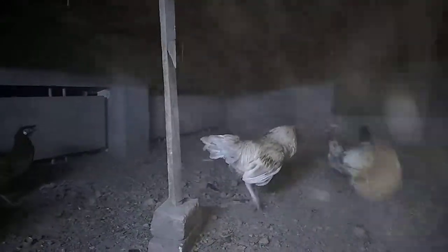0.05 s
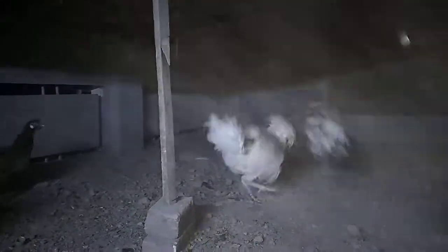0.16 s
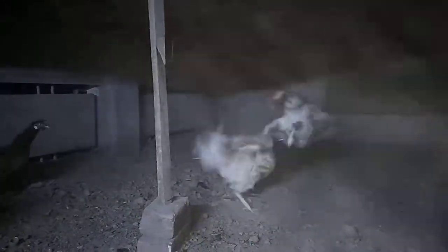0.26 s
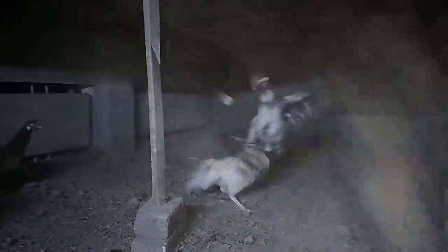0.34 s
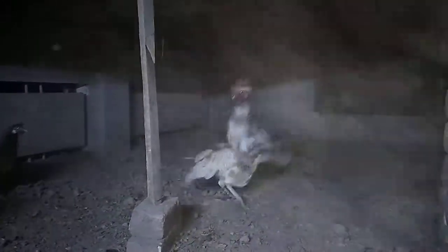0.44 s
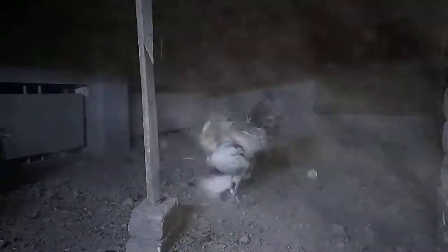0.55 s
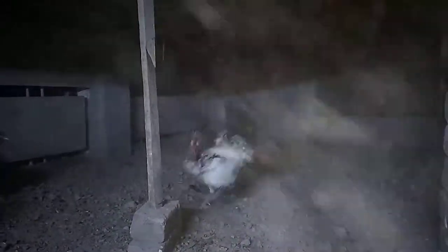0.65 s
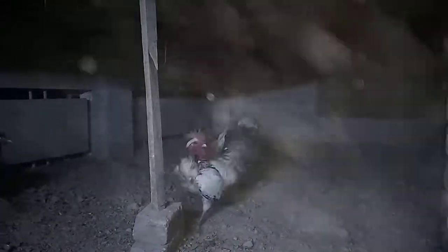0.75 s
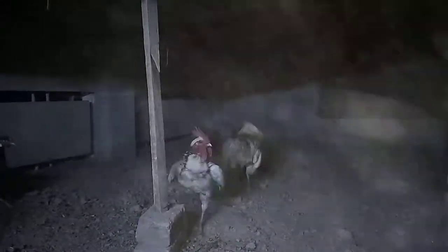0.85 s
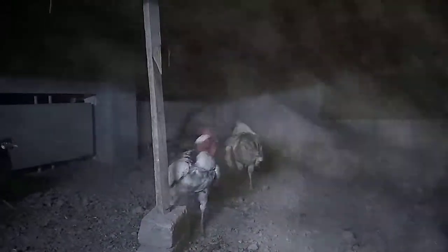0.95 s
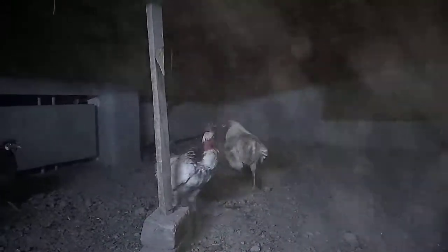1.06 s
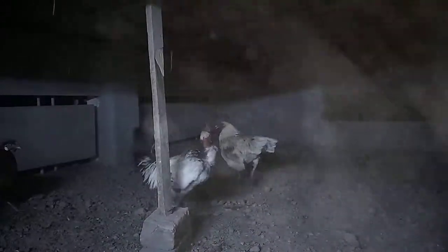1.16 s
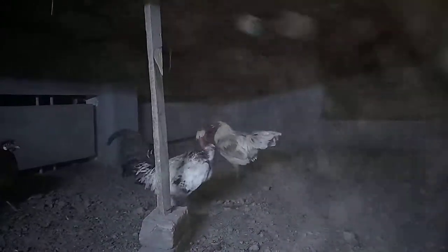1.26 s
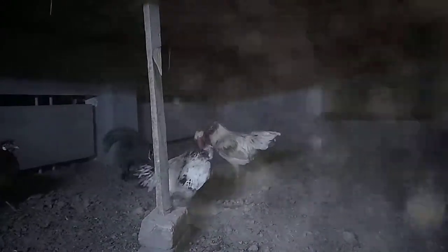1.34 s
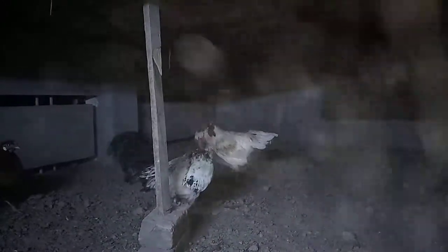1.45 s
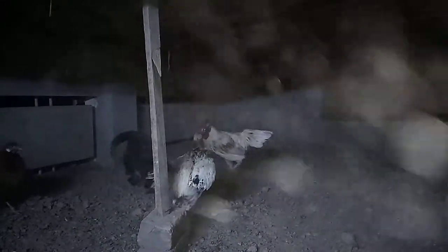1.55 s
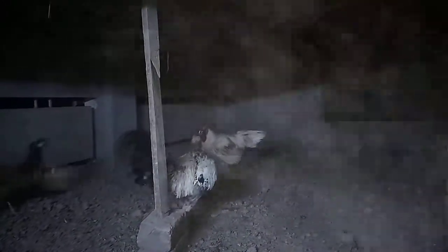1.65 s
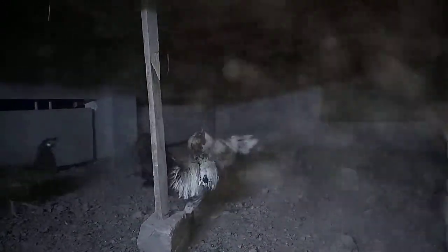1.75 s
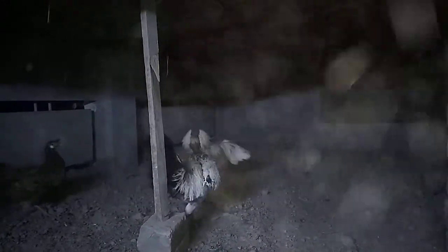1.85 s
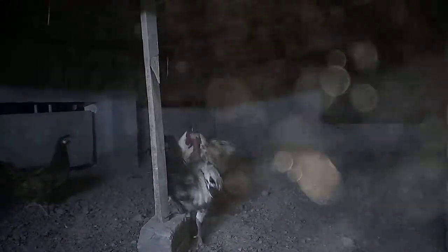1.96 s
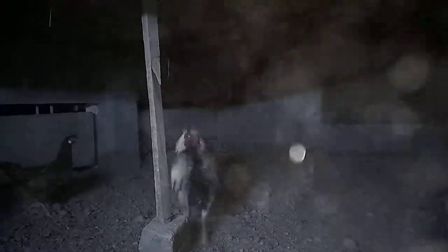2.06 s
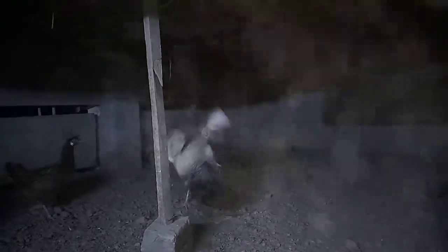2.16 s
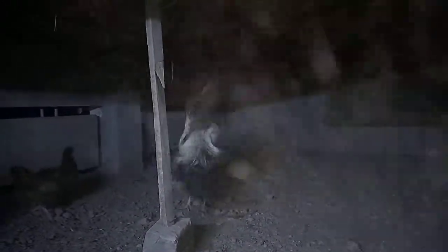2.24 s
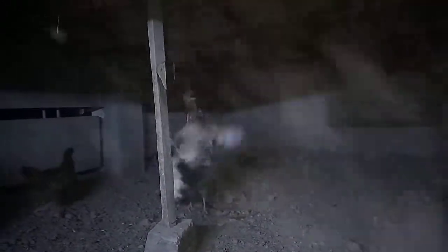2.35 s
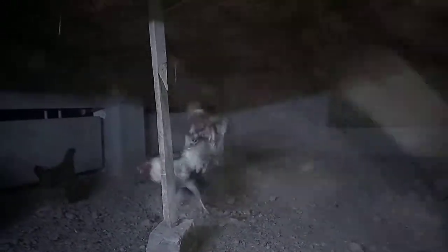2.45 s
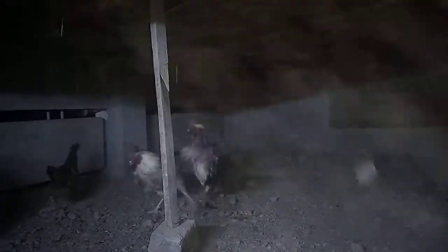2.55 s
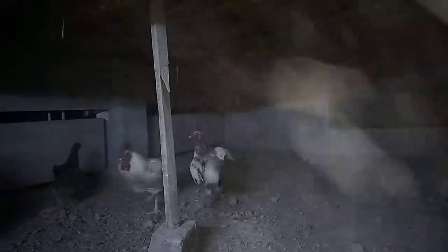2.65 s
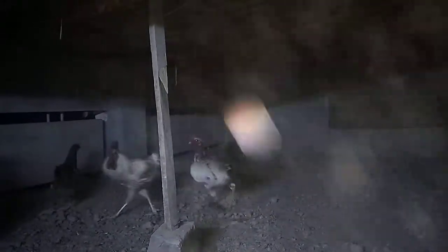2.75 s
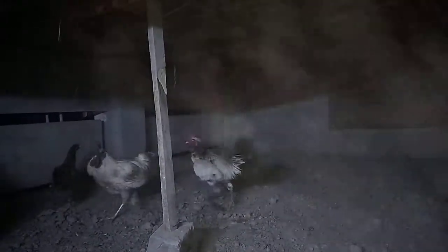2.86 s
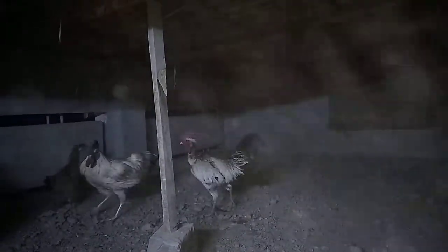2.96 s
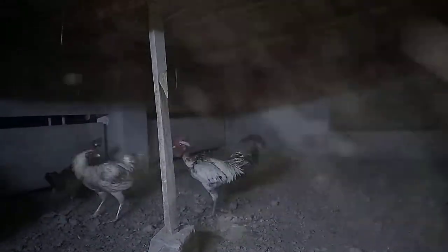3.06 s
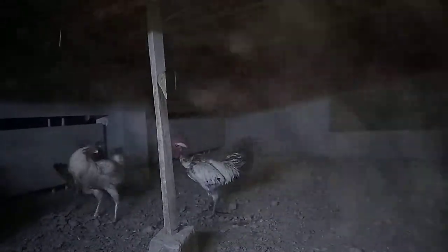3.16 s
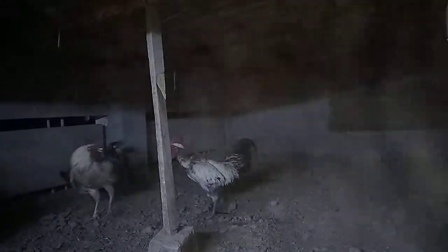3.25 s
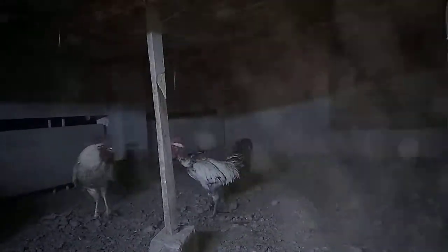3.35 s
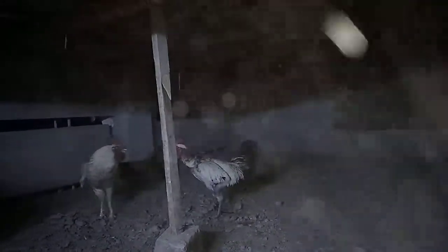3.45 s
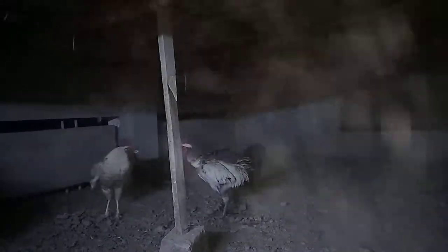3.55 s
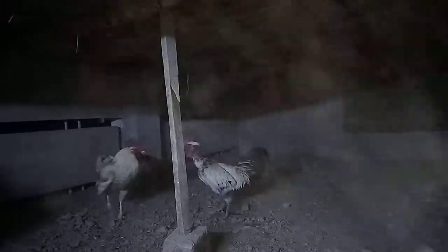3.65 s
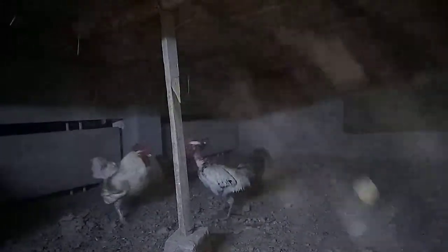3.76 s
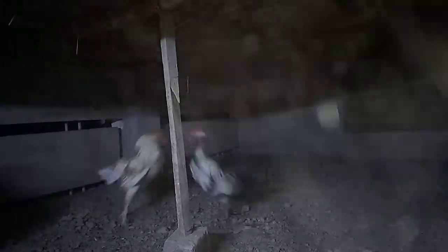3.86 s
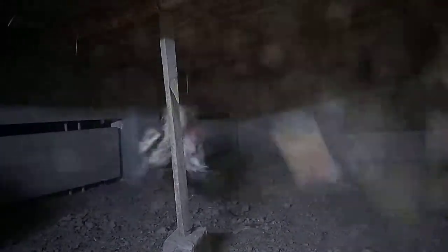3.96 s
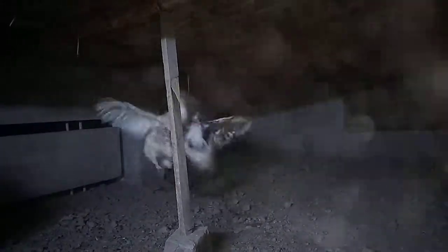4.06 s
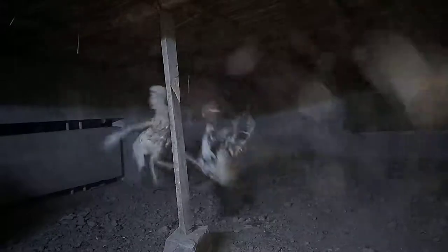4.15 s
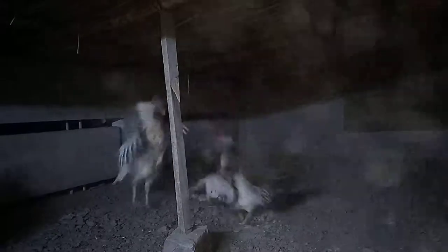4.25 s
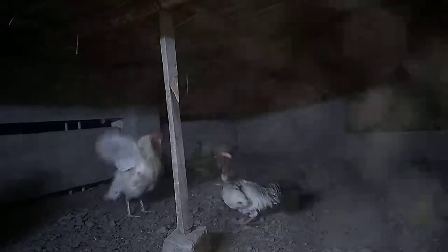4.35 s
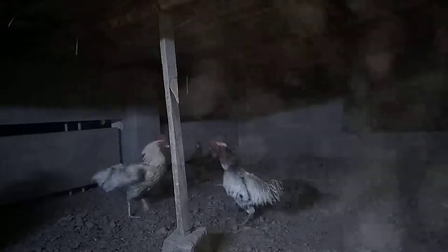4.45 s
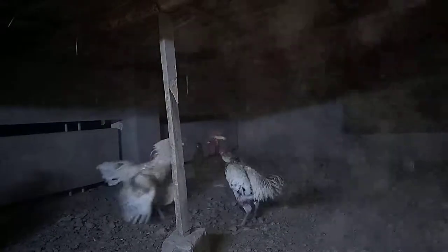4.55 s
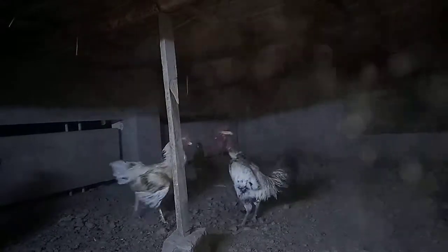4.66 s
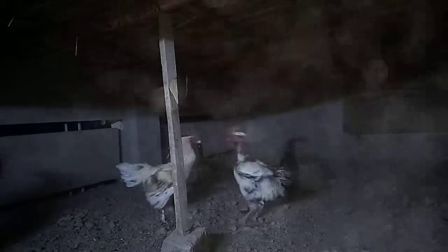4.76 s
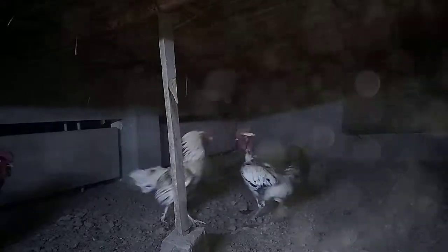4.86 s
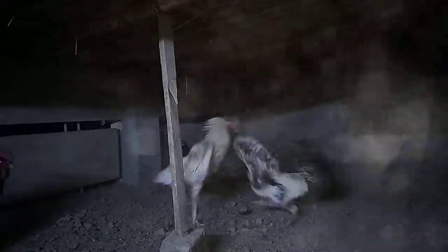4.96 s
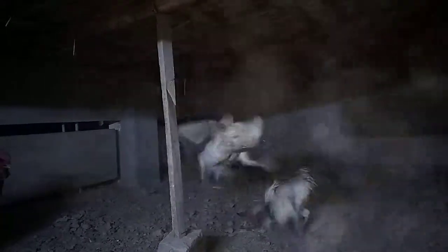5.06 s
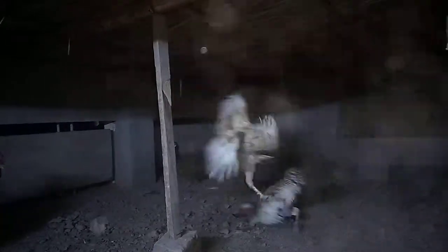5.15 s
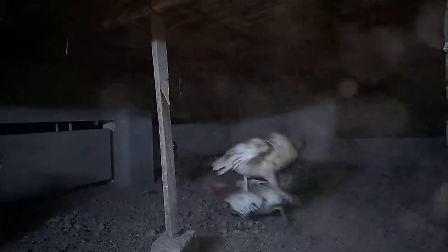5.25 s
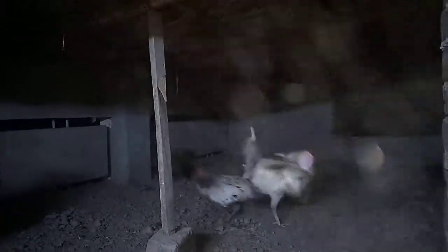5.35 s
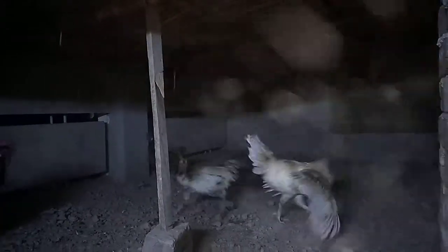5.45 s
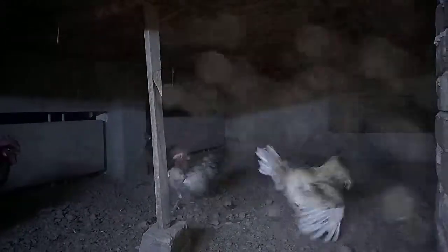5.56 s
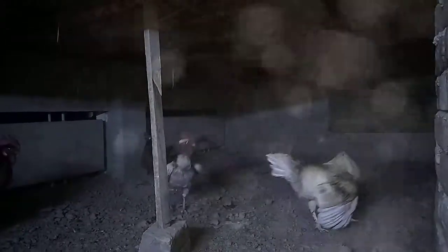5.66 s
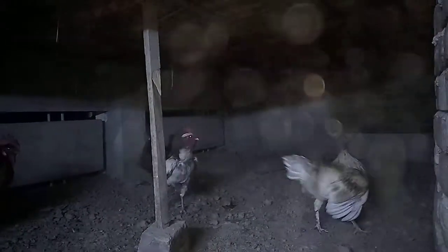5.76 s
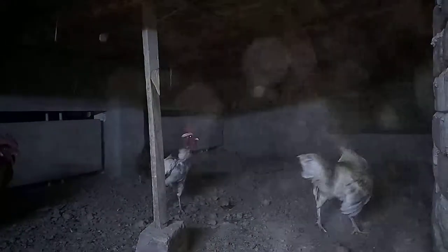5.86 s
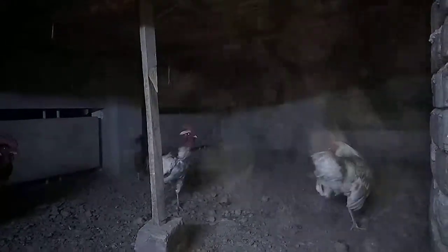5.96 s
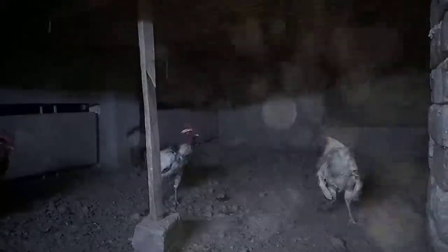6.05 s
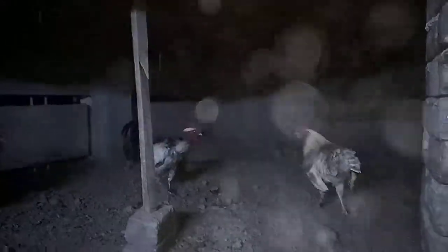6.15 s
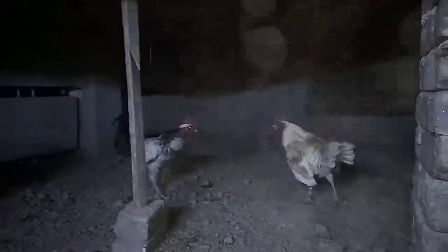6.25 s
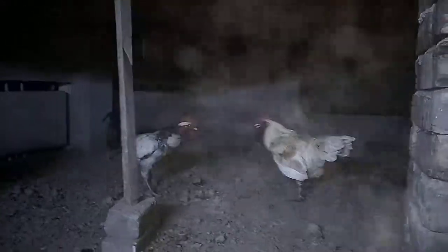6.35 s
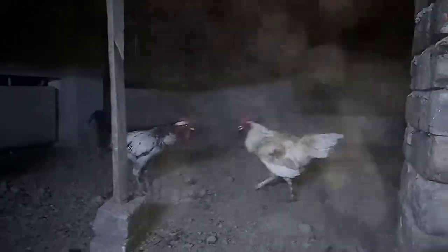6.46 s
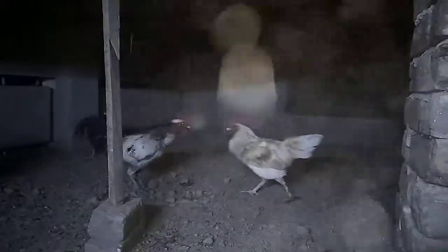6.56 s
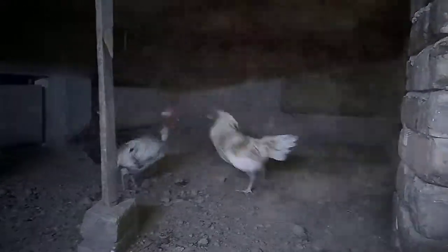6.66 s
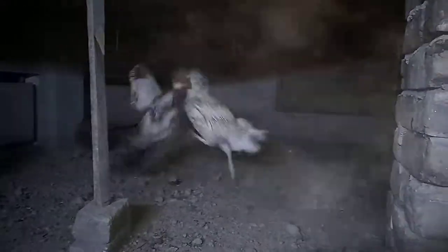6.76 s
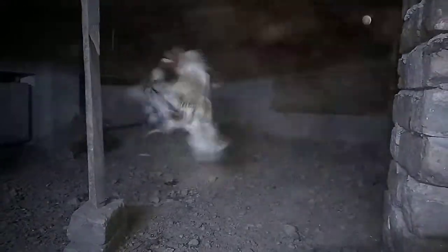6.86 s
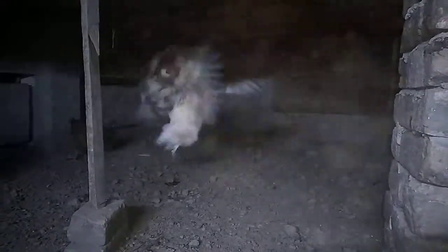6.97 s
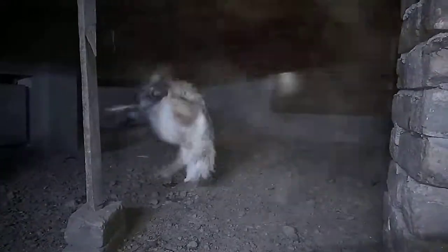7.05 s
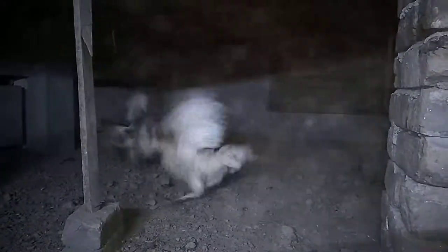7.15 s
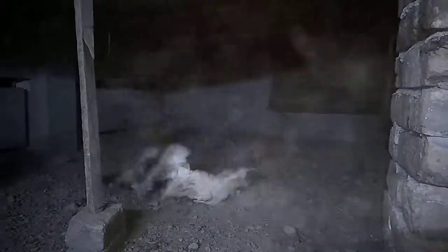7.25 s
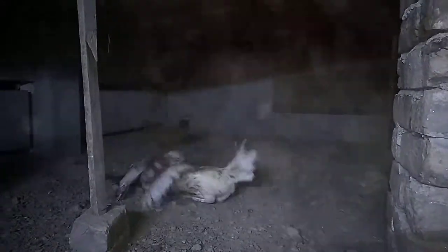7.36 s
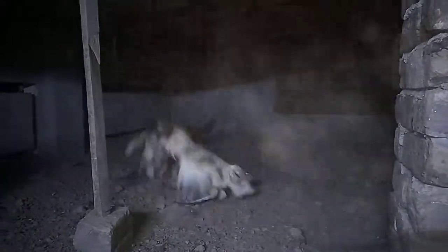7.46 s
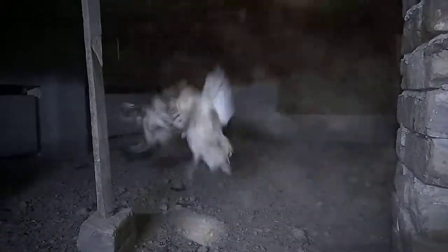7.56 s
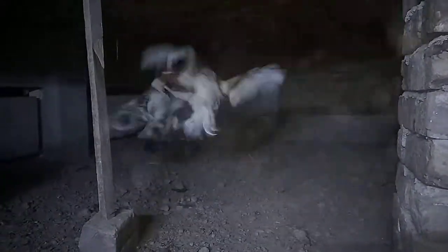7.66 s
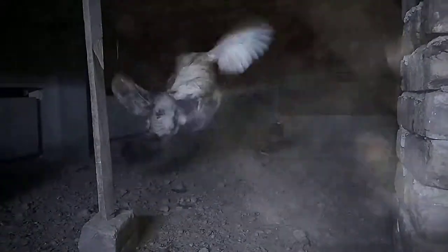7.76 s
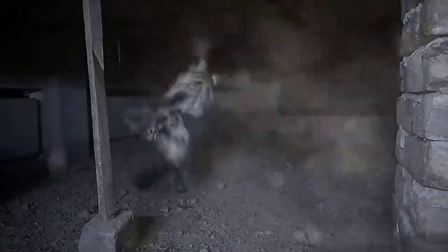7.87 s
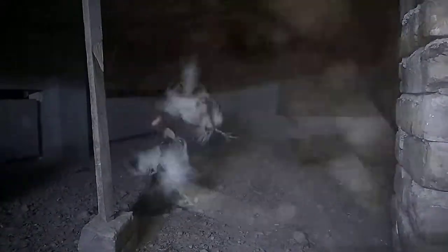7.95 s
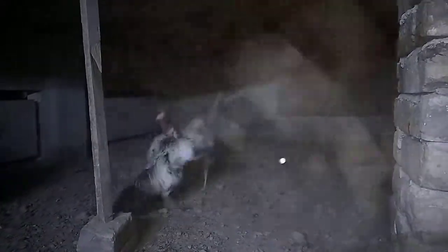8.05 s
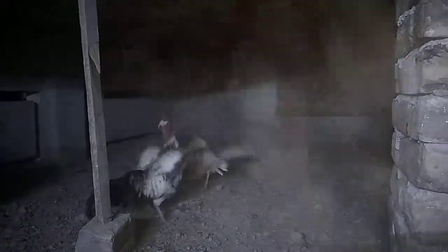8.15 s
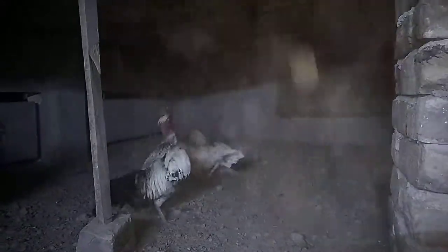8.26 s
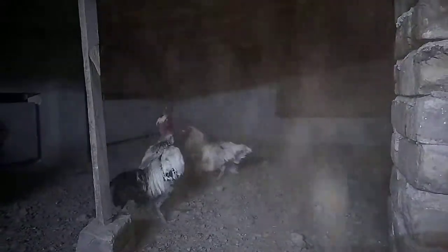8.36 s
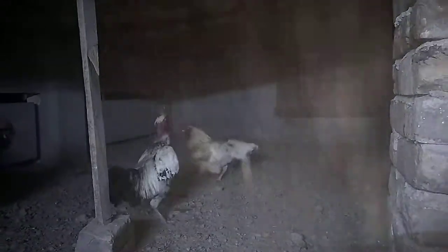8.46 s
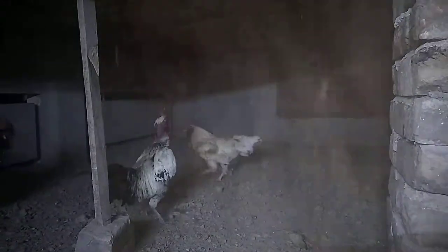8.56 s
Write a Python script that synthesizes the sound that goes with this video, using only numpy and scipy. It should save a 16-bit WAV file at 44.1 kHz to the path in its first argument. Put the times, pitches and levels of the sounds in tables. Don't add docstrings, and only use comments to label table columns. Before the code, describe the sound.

Close handheld stereo pickup in a dim stone-walled shed with faint hiss and wavering hum. Clucks and an early flurry of hard wing blows open the scene, gravel crunching lightly. Hens whine softly and squawk briefly as more flapping bursts follow, with quieter gaps between. Near the end comes the longest, thickest scuffle of thumps and rustling feathers, overtaken by a loud, broken rooster crow that settles into a clear sustained note.

```python
import sys
import numpy as np
from scipy import signal
from scipy.fft import rfft, irfft
from scipy.io import wavfile
from scipy.ndimage import uniform_filter1d

SR = 44100
rng = np.random.default_rng(int(sys.argv[2]) if len(sys.argv) > 2 else 0)


def to_wav(sig):
    pcm = np.clip(np.atleast_2d(sig), -1, 1) * 32767
    pcm = np.round(pcm).astype(np.int16)
    wavfile.write(sys.argv[1], SR, pcm.T)


def ratio(d):
    e = np.asarray(d, float) / 20
    return 10 ** e


N = 379686
T = np.arange(N) / SR

# (frequency [Hz], density [dB per Hz])
AIR_SPECTRUM = [(220, -57), (380, 10), (1450, 2.5), (1750, 2.5), (4300, -8.5), (10000, -6.5), (16000, -25)]
# (frequency [Hz], level [dB])
HUM_TONES = [(800, -74.5), (1395, -78.5), (1520, -77.5)]
# (frequency [Hz], likeness [0-1])
STEREO_LIKENESS = [(60, 0.79), (380, 0.72), (2380, 0.083), (15000, 0.18)]
# (time [s], length [s], upper band level [dB], deep band level [dB])
RUMBLE_SPELLS = [(0.0, 0.25, -65, -56), (0.274, 0.2, -53, -75), (0.693, 0.12, -59.5, -80),
                 (1.041, 0.13, -59, -66), (1.269, 0.31, -65, -57), (1.623, 0.29, -54.5, -52.5),
                 (1.995, 0.044, -49, -84), (2.208, 0.23, -44.5, -53), (2.536, 0.13, -51.5, -64),
                 (2.807, 0.15, -59.5, -61), (3.072, 0.029, -47, -81), (3.106, 0.21, -61, -65),
                 (3.494, 0.13, -57, -80), (3.62, 0.12, -55, -50), (3.982, 0.31, -53, -66),
                 (4.263, 0.28, -55, -59), (4.546, 0.24, -63, -60.5), (4.946, 0.2144, -52.5, -75),
                 (5.22, 0.13, -60.5, -74.5), (5.432, 0.24, -54.5, -62), (5.889, 0.044, -44, -53),
                 (5.974, 0.058, -52, -71), (6.21, 0.1, -55.5, -64), (6.44, 0.096, -54, -62.5),
                 (6.61, 0.086, -52, -73), (6.736, 0.44, -53.5, -59), (6.945, 0.19, -40.5, -52),
                 (7.257, 0.099, -61, -46), (7.57, 0.37, -45.5, -69.5), (7.894, 0.44, -55, -83)]
# (time [s], peak level [dB])
GRAVEL_STEPS = [
    (0.082, -37.5),
    (1.9689, -37.5),
    (2.0916, -36.5),
    (2.7048, -49),
    (3.1677, -50),
    (3.2321, -45.5),
    (4.7406, -65),
    (5.732, -45),
    (6.6882, -44.5),
]
# (time [s], level [dB])
RUSTLE_LEVEL = [(0.0, -62), (0.47, -43), (0.79, -59), (1.82, -62.5), (2.4, -38.5), (2.57, -50), (3.79, -79),
                (4.16, -37), (4.57, -60.5), (5.42, -48.5), (5.86, -68.5), (6.6, -58.5), (7.1, -30),
                (7.33, -49), (7.57, -35.5), (7.7, -28)]
# (frequency [Hz], density [dB per Hz])
RUSTLE_SPECTRUM = [(500, -1.5), (800, -4.5), (2800, -10.5), (12000, -13.5), (16000, -14.5)]
# (time [s], length [s], first pitch [Hz], last pitch [Hz], level [dB])
SHUT_BEAK_WHINES = [(1.35, 0.034, 501, 450, -36.5), (1.39, 0.13, 503, 432, -48.5),
                    (2.08, 0.032, 454, 466, -48.5), (2.74, 0.088, 426, 395, -54),
                    (3.4, 0.127, 458, 475, -51), (3.565, 0.064, 431.4, 403, -53.5),
                    (4.375, 0.05, 637, 390, -43.5), (4.495, 0.037, 630, 380, -48.5),
                    (4.885, 0.095, 452, 527, -50), (6.04, 0.062, 532, 514, -54),
                    (6.102, 0.032, 711, 424, -43), (6.125, 0.026, 455, 460, -41),
                    (6.275, 0.055, 556, 450, -45.5), (6.487, 0.05, 559, 463, -45)]
# (time [s], length [s], first pitch [Hz], last pitch [Hz], level [dB])
OPEN_BEAK_WHINES = [(1.49, 0.084, 408, 413, -57), (2.01, 0.089, 520, 441, -55.5),
                    (2.585, 0.023, 622, 620, -45.5), (2.605, 0.046, 510, 460, -46.5),
                    (2.67, 0.13, 453, 428, -50.5), (2.705, .08, 449.5, 426, -52.5),
                    (2.84, 0.08, 416, 395, -58.5), (3.58, 0.045, 405, 425, -54),
                    (4.362, 0.043, 619.4, 501, -33.5), (4.40, 0.043, 464, 396, -47),
                    (4.572, 0.027, 488, 505, -60.5), (4.74, 0.043, 475.5, 467, -51),
                    (4.905, 0.041, 450, 532, -47), (4.96, 0.023, 410, 404, -54),
                    (5.49, 0.053, 439, 421.2, -56.5), (6.045, 0.075, 519, 495, -52),
                    (6.11, 0.044, 484, 456, -53), (6.15, 0.071, 463, 470, -55),
                    (6.2, 0.13, 467, 430, -55.5)]
# (time [s], level [dB], half length [s], pitch [Hz])
RASPY_SQUAWKS = [
    (1.56, -43, 0.016, 452),
    (4.77, -50.5, 0.019, 468.3),
]
# (time [s], peak level [dB], 2nd partial [Hz], 3rd partial level [dB], length [s])
HEN_CLUCKS = [
    (0.047, -41.5, 605, -49.5, 0.046),
    (0.238, -31.5, 669, -35, 0.026),
    (0.551, -42, 520, -64, 0.019),
    (0.756, -40.5, 433, -79.5, 0.012),
    (1.167, -32, 623, -34.5, 0.033),
    (3.345, -29, 630, -44, 0.03),
    (3.53, -29, 639, -43.5, 0.029),
    (5.965, -54.5, 554, -70, 0.023),
    (6.01, -48, 555, -40.5, 0.025),
]
# (time [s], peak level [dB], thump level [dB], decay time t60 [s])
WING_BLOWS = [(0.2603, -16, -23.5, 0.086), (0.3001, -20, -30.5, 0.092), (0.4017, -26.5, -52, 0.061),
              (0.4904, -38, -51.5, 0.33), (0.752, -34, -62, 0.046), (2.2076, -30, -31, 0.21),
              (2.2528, -24, -43, 0.11), (2.3311, -29.5, -31.5, 0.061), (2.3469, -24.5, -50, 0.059),
              (2.445, -36, -42.5, 0.096), (2.558, -39, -45.5, 0.072), (3.999, -37.5, -44, 0.2),
              (4.0586, -36.5, -32.5, 0.12), (4.0974, -24.5, -51, 0.076), (4.2571, -38.5, -56, 0.29),
              (4.3081, -51, -42, 0.14), (5.003, -21.5, -32, 0.065), (5.157, -30, -47, 0.069),
              (5.374, -44, -49, 0.13), (6.8472, -42.5, -39, 0.93), (6.8872, -24.5, -39, 0.26),
              (6.9511, -33.5, -31.5, 0.18), (6.9874, -28.5, -37, 0.12), (7.0467, -17, -28, 0.076),
              (7.1282, -32.5, -36, 0.07), (7.1853, -35.5, -34.5, 0.21), (7.268, -32, -32, 0.17),
              (7.293, -24, -36, 0.083), (7.3288, -26.5, -28.5, 0.07), (7.634, -13, -33, 0.076)]
# (time [s], peak level [dB], decay time t60 [s])
WING_BRUSHES = [
    (0.1224, -46, 0.025),
    (1.0333, -40, 0.076),
    (1.3655, -57, 0.39),
    (1.842, -42, 0.078),
    (2.0011, -53.5, 0.92),
    (3.8737, -44.5, 0.43),
    (5.0775, -41, 0.3),
    (5.529, -45, 0.24),
]
# (time [s], pitch [Hz], effort [dB], hoarseness [0-1])
CROW_SYLLABLES = [
    [(7.372, 615, -35, 0.97), (7.40, 622, -29.5, 1.06), (7.42, 676.4, -26.5, 0.23),
     (7.445, 693.3, -28, 0.42), (7.48, 715, -26, 0.42), (7.52, 727, -26.5, 0.12), (7.552, 723, -25.5, 0.2),
     (7.575, 734.3, -28, 0.8), (7.61, 714.3, -41, 0.9)],
    [(7.662, 568, -31.5, 0.8), (7.684, 610, -25.5, 0.91), (7.70, 796, -24.5, 0.2), (7.73, 805, -24.5, 0.31),
     (7.755, 758, -26, 0.66), (7.775, 700, -29.5, 0.92)],
    [(7.795, 721, -24.5, 0.63), (7.815, 740.3, -27.5, 0), (7.845, 742, -29.5, 0), (7.865, 716.5, -25, 0.55),
     (7.885, 628.6, -26.5, 0.59), (7.905, 700, -29, 0.4), (7.922, 782.6, -24.5, 0.54),
     (7.942, 960.7, -29.5, 0.92), (7.968, 902.7, -29, 0.87)],
    [(7.99, 725, -28, 0.74), (8.02, 740.4, -27.5, 0.32), (8.134, 766, -24, 0.16), (8.194, 746.6, -26, 0.05),
     (8.262, 686, -26.5, 0.02), (8.30, 716, -26, 0.03), (8.39, 736.2, -28.5, 0), (8.45, 743.6, -28, 0),
     (8.61, 735.6, -27, 0)],
]
# (multiple of the pitch [1], level [dB])
CROW_PARTIALS = [(1, 2.5), (2, -0.5), (3, -2), (4, -27), (5, -9.5), (6, -35), (7, -28.5), (8, -35),
                 (9, -34), (10, -38.5), (11, -35.5), (12, -36), (13, -49), (14, -39.5), (15, -35.5),
                 (16, -40), (17, -43), (18, -37), (19, -42), (20, -49), (21, -40)]
# (frequency [Hz], width [Hz], level [dB])
THROAT_RESONANCES = [(780, 100, -5.5), (1510, 1940, -9.5), (2480, 170, -1.5), (3580, 150, -8.5),
                     (10400, 720, -31)]
# (frequency [Hz], difference re sum [dB], phase [turns])
CROW_STEREO = [(700, -10.5, 0.3), (1590, 4, 0.26), (2300, -1, 0.18), (3650, -2.5, 0.29), (7750, 0.5, 0.31),
               (13700, 1, 0.037)]
# (frequency [Hz], half width [Hz], gain [dB])
CROW_RINGS = [(742, 16.3, 8.5), (1290, 18, 10.5), (1388, 14, 9), (1553, 110, 6.5), (1847, 74, 6.5),
              (2212, 78, 7), (3578, 203, 11.5), (716, 7.6, -1.5), (1434, 7.8, -23), (1467, 6.87, -7),
              (2050, 9, -15), (2167, 12.5, -22), (2700, 140, -8)]

AIR_DB = -65
SHUT_BEAK_DB, OPEN_BEAK_DB = [-7.5, -15.5, -23.5], [-16.5, -3, -23.5]
HEN_RING_HZ, HEN_RING_WIDTH_HZ, HEN_RING_DB = 1305, 93, 16
WHINE_RISE, WHINE_ROUND = 0.76, 0.68
BRUSH_THUMP_DB, SLAP_FOLLOWS_THUMP, SWELL_S = -40, 0.32, 0.0065
QUILL_SNAP, PUFF_FLUTTER_DB = 8.8, 2.5
HOARSE_LOSS_DB, HOARSE_HISS_DB = 3.5, 9
THIRDS_DEPTH, CROW_LOW_CUT_HZ = 0.94, 550
SHED_T60_S, WALL_CUT_HZ, ECHO_S = 0.11, 5300, 0.027
CROW_ECHO_DB, CROW_ECHO_T60_S = -11, 0.19


def rms_one(x):
    return x / np.sqrt(np.mean(x ** 2) + 1e-20)


def in_time(rows):
    s, *columns = np.transpose(rows)
    return [np.interp(T, s, c) for c in columns]


def at_hz(points, hz, axis=1):
    points = np.array(points)
    return np.interp(np.log(hz), np.log(points[:, 0]), points[:, axis])


def drift(rate, size=N):
    r = np.exp(-2 * np.pi * rate / SR)
    walk = signal.lfilter([1], [1, -2 * r, r * r], rng.standard_normal(size + 9000))
    return rms_one(walk[9000:])


def band(x, lo_hz, hi_hz):
    return signal.sosfilt(signal.butter(2, [lo_hz, min(hi_hz, 19000)], "band", fs=SR, output="sos"), x)


def stereo_noise(spectrum, patchy_db):
    hz = np.fft.rfftfreq(N, 1 / SR) + 1
    alike = np.clip(at_hz(STEREO_LIKENESS, hz), 0, 1)
    noise = rfft(rng.standard_normal((2, N))) * ratio(at_hz(spectrum, hz))
    mid, side = noise * np.sqrt([1 + alike, 1 - alike])
    left_right = np.array([mid + side, mid - side])
    out = 0
    for octave in range(6):
        share = np.clip(1 - np.abs(np.clip(np.log2(hz / 400), 0, 5) - octave), 0, 1)
        out = out + ratio(patchy_db * drift(15)) * irfft(share * left_right, N)
    return rms_one(out)


def placed(x, pan_db):
    return x * ratio([[pan_db / 2], [-pan_db / 2]])


def shed(x, first_s, t60):
    t = np.arange(int(.5 * SR)) / SR
    sparse = rng.standard_normal((2, len(t))) * (rng.random((2, len(t))) < .02 + t)
    dull = signal.lfilter(*signal.butter(1, WALL_CUT_HZ, fs=SR), sparse)
    tail = dull * ratio(-60 * t / t60) * (t > first_s)
    tail = tail / np.sqrt(np.sum(tail ** 2) / 2)
    return signal.fftconvolve(x * np.ones((2, 1)), tail, axes=1)[:, :N]


def night_air():
    tones = 0
    for hz, level_db in HUM_TONES:
        tones = tones + ratio(level_db) * rms_one(band(rng.standard_normal((2, N)), hz - 12, hz + 12))
    hiss = stereo_noise(AIR_SPECTRUM, patchy_db=2.2) * ratio(2 * drift(9))
    return ratio(AIR_DB) * hiss + tones


def rumble():
    air = rng.standard_normal((2, 3, N))
    upper, deep = air[:, :1] + 0.29 * air[:, 1:]
    upper = rms_one(band(band(upper, 56.7, 137), 75, 315)) * ratio(3 * drift(11.5))
    deep = rms_one(band(band(deep, 53.0, 81.0), 42, 77))
    upper_gain = ratio(-79.0 + 3.5 * drift(2.8))
    deep_gain = ratio(-111.5 + 1.9 * drift(11))
    for s, length, upper_db, deep_db in RUMBLE_SPELLS:
        spell = np.clip(np.minimum(T - s + 0.031, s + length + 0.013 - T) / 0.066, 0, 1) ** 2
        upper_gain = upper_gain + ratio(upper_db) * spell
        deep_gain = deep_gain + ratio(deep_db) * spell
    return placed(upper_gain * upper + deep_gain * deep, pan_db=-4.5)


def steps():
    crunch = 0
    for s, peak_db in GRAVEL_STEPS:
        crunch = crunch + ratio(peak_db - 17.0) * np.exp(-((T - s - .015) / 0.014) ** 2)
    return crunch * rms_one(band(rng.standard_normal((2, N)), 4200, 14000))


def rustle():
    crackle = ratio(4.5 * np.minimum(rng.exponential(1, N), 5) * (rng.random(N) < .05))
    hiss = rms_one(stereo_noise(RUSTLE_SPECTRUM, patchy_db=.8) * crackle) * ratio(2.5 * drift(30))
    level_db = in_time(RUSTLE_LEVEL + [(7.9, -85)])[0]
    return ratio(level_db - 8.5) * hiss


def whines():
    out = np.zeros(N)
    for notes, beak_db in ((SHUT_BEAK_WHINES, SHUT_BEAK_DB), (OPEN_BEAK_WHINES, OPEN_BEAK_DB)):
        partials_db = beak_db + [beak_db[2] - 5.5, beak_db[2] - 12]
        for s, length, first_hz, last_hz, level_db in notes:
            part = np.linspace(0, 1, round(1.086 * length * SR))
            pitch = first_hz + (last_hz - first_hz) * part
            turns = np.cumsum(pitch * (1 + 0.0078 * drift(54, size=len(part)))) / SR
            shape = np.sin(np.pi * part ** WHINE_RISE) ** WHINE_ROUND
            shake = ratio(level_db) * shape * (1 + 0.59 * drift(58, size=len(part)))
            at = round(s * SR)
            for k, partial_db in enumerate(partials_db, 1):
                ring_db = HEN_RING_DB * np.exp(-((k * pitch - HEN_RING_HZ) / HEN_RING_WIDTH_HZ) ** 2)
                tone = np.sqrt(2) * ratio(partial_db + ring_db) * shake * np.sin(2 * np.pi * k * turns)
                out[at:][:len(part)] += tone
    return out


def squawks():
    out = np.zeros(N)
    for s, level_db, half_s, hz in RASPY_SQUAWKS:
        pitch = hz * (1 - 2.6 * np.clip(T - s, -.05, .05))
        turns = np.cumsum(pitch * (1 + 0.022 * drift(140))) / SR
        pulses = (np.diff(np.floor(turns), prepend=0) > 0) * rng.uniform(0.1, 1, N)
        voice = rms_one(band(band(pulses, 290, 1650), 260, 1680))
        out += ratio(level_db) * voice * np.exp(-((T - s) / half_s) ** 2 / 2)
    return out


def clucks():
    out, t = np.zeros(N + SR), np.arange(SR // 5) / SR
    for s, peak_db, hz, third_db, length in HEN_CLUCKS:
        shape = np.sin(np.pi * np.clip(t / max(length, .01), 0, 1) ** .75) ** 1.2
        pitch = hz / 2 * (1.03 - 1.68 * t)
        turns = np.cumsum(pitch * (1 + 0.047 * drift(97, size=len(t)))) / SR
        levels_db = [(peak_db + third_db) / 2 - 6.0, peak_db, third_db]
        levels_db += [third_db - 11.0, third_db - 23.0, third_db - 22.0, third_db - 28.0]
        tone = sum(ratio(d) * np.sin(2 * np.pi * k * turns) for k, d in enumerate(levels_db, 1))
        at = round((s - .004) * SR)
        out[at:at + len(t)] += shape * tone
    return out[:N] + ratio(-8.5) * np.roll(out[:N], round(ECHO_S * SR))


def blows():
    out, t = np.zeros((2, N + SR)), np.arange(SR // 3) / SR - .05
    brushes = [(s, d, d + BRUSH_THUMP_DB, t60) for s, d, t60 in WING_BRUSHES]
    rise = np.exp(np.minimum(t, 0) / SWELL_S)
    for s, peak_db, thump_db, t60 in WING_BLOWS + brushes:
        def dying(stretch):
            return rise * ratio(-60 * np.maximum(t, 0) / (max(t60, .02) * stretch))

        noise = rng.standard_normal((3, len(t)))
        grains = noise * ratio(3.5 * np.minimum(rng.exponential(1, len(t)), 3) * (rng.random(len(t)) < .05))
        grains = grains * ratio(4 * drift(60, size=len(t)))
        thump = ratio(thump_db - 4.5) * rms_one(band(noise[0] * dying(2.37), 80.0, 547))

        quills = (grains[0] + .5 * grains[1:]) * dying(1.23) * rise ** 2
        quills[:, np.argmax(t >= 0)] += QUILL_SNAP
        knocks = sum(band(quills, hz, 1.35 * hz) * ratio(1) for hz in 330 * 4.5 ** rng.random(3))
        slap_db = peak_db + SLAP_FOLLOWS_THUMP * (thump_db - peak_db)
        slap = ratio(slap_db - 9.0) * rms_one(band(quills, 148, 1750) + knocks)

        air = (0.12 * grains[0] + noise[1:]) * dying(1.74)
        puff = 0
        for lo_hz, hi_hz in ((1250, 4280), (3500, 7400), (7500, 10870)):
            puff = puff + band(air, lo_hz, hi_hz) * ratio(PUFF_FLUTTER_DB * drift(40, size=len(t)))
        puff = ratio(peak_db - 11.0) * rms_one(puff)

        at = round((s - .05) * SR)
        loudness = np.sqrt(np.mean(dying(5.4) ** 2))
        out[:, at:at + len(t)] += loudness * placed(thump + slap + puff, pan_db=-2.0)
    return out[:, :N]


def fade(rows, edge_s):
    return np.clip(np.minimum(T - rows[0][0], rows[-1][0] + edge_s - T) / edge_s, 0, 1)


def crow_partial(k, level_db, pitch, effort_db, hoarse, turns):
    level = effort_db + 10.0 + level_db + 3.5 * drift(10.2) - HOARSE_LOSS_DB * hoarse
    if k in (1, 2, 3, 5):
        ring_db = sum(d * np.exp(-((k * pitch - hz) / width) ** 2) for hz, width, d in CROW_RINGS)
        level = effort_db + level_db + ring_db
        level = level - 0.91 * HOARSE_LOSS_DB * hoarse * (k > 2)
    level = ratio(level)
    if k == 5:
        level = level * np.exp(-((k * pitch - np.clip(k * pitch, 3450, 3800)) / 200) ** 2)
    if k in (4, 6):
        level = level + ratio(effort_db + 0.5) * np.exp(-((k * pitch - 3700) / 220) ** 2)
    uneven = .04 + .6 * hoarse + .3 * (k > 5) + .5 * (k > 8)
    level = level * (1 + uneven * drift(84 + 50 * (k > 5))) / np.sqrt(1 + uneven ** 2)
    level = level * (1 + 0.017 * (k > 1) * np.cos(np.pi * turns + k))
    level = level * (1 + THIRDS_DEPTH * hoarse ** 2 * (k > 1) * np.cos(2 * np.pi * turns / 3 + k))
    lead = at_hz(CROW_STEREO, k * 740, axis=2) + 0.056 * drift(5.3)
    side_gain = ratio(at_hz(CROW_STEREO, k * 740) + 2.0 * drift(7.7))
    side = side_gain * np.sin(2 * np.pi * (k * turns + lead))
    return np.sqrt(2) * level * (np.sin(2 * np.pi * k * turns) + side * [[1], [-1]])


def crow_noise(effort_db, hoarse, turns):
    puffs = rng.standard_normal((2, N)) * (1.1 + np.cos(2 * np.pi * turns))
    puffs = puffs + 1.1 * puffs[::-1]
    rasp = ratio(-36) * band(puffs, 400, 12000)
    for k, (hz, width, level_db) in enumerate(THROAT_RESONANCES):
        rasp = rasp + (-1) ** k * ratio(level_db) * band(puffs, hz - width / 2, hz + width / 2)
    rasp = ratio(effort_db + 3) * hoarse ** 2 * rms_one(rasp)
    breath_db = effort_db + 10.0 - 48.5 + HOARSE_HISS_DB * hoarse + 4 * drift(25)
    return rasp + ratio(breath_db) * rms_one(band(puffs, 4460, 15000))


def crow():
    pitch, effort_db, hoarse = in_time(sum(CROW_SYLLABLES, []))
    pitch = uniform_filter1d(pitch, size=500)
    hoarse = np.clip(hoarse, 0, 1)
    gate = np.maximum(fade(CROW_SYLLABLES[0], 0.012), fade(sum(CROW_SYLLABLES[1:], []), 0.01))
    turns = np.cumsum(pitch * (1 + (.001 + .021 * hoarse) * drift(75))) / SR
    voice = np.zeros((2, N))
    for k, level_db in CROW_PARTIALS:
        voice += crow_partial(k, level_db, pitch, effort_db, hoarse, turns)
    voice = gate * (voice + crow_noise(effort_db, hoarse, turns))
    return signal.sosfilt(signal.butter(4, CROW_LOW_CUT_HZ, "high", fs=SR, output="sos"), voice)


def scene():
    background = night_air() + rumble() + steps() + rustle()
    hens = whines() + squawks() + clucks()
    fight = blows()
    loud = crow()
    room = shed(ratio(-7) * hens + ratio(-12.5) * fight, first_s=0.0057, t60=SHED_T60_S)
    room = room + ratio(CROW_ECHO_DB) * shed(loud, first_s=.008, t60=CROW_ECHO_T60_S)
    return background + hens + fight + loud + room


def roll_off(x):
    return signal.sosfilt(signal.butter(12, 15760, fs=SR, output="sos"), x)


def record(dry):
    low = irfft(rfft(dry) * (np.abs(np.fft.rfftfreq(N, 1 / SR) - 275) < 95), N)
    level = np.sqrt(uniform_filter1d(np.mean(low ** 2, axis=0), size=1500))
    ducked = dry - low * ratio(-67) ** 2 / (ratio(-66) ** 2 + level ** 2)
    x = signal.sosfilt(signal.butter(2, 35, "high", fs=SR, output="sos"), ducked)
    x = signal.sosfilt(signal.ellip(8, 1, 50, 15790, fs=SR, output="sos"), x)
    mix = 0.89 * np.tanh(x / 0.71)
    return roll_off(mix)


dry = scene()
out = record(dry)
to_wav(out)
```